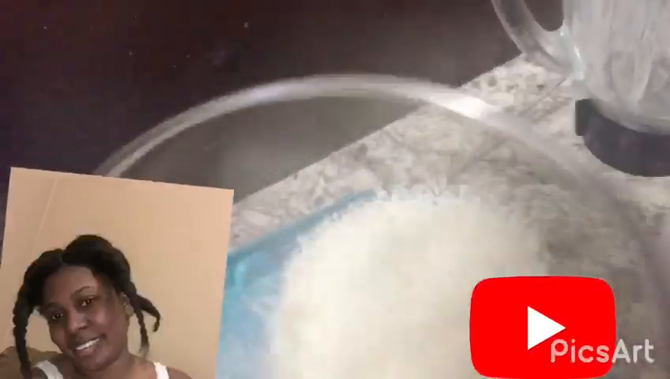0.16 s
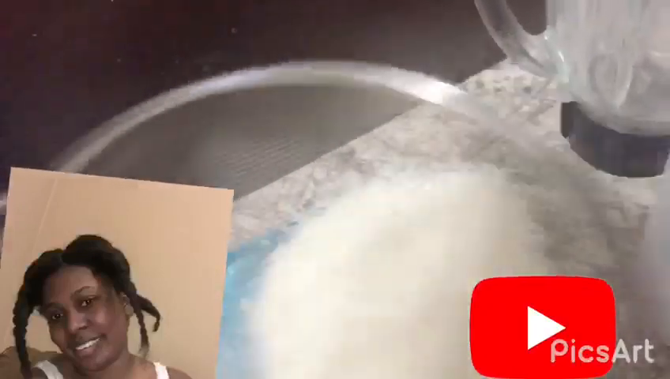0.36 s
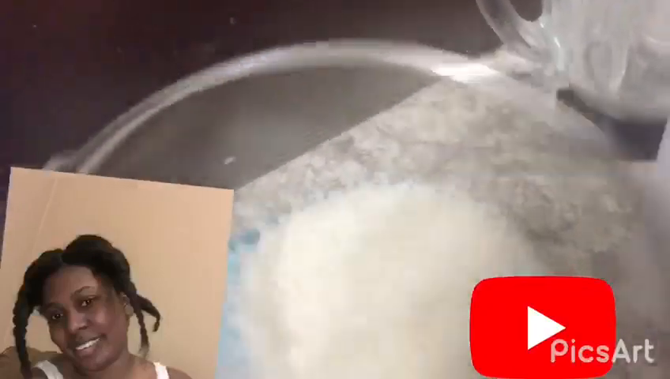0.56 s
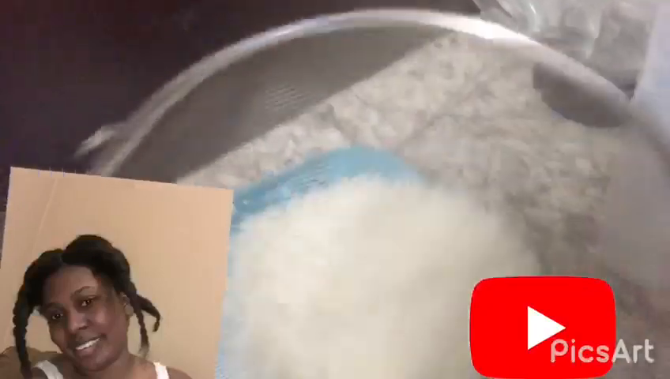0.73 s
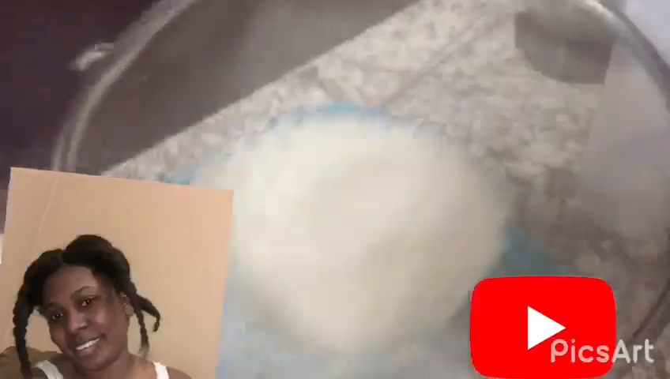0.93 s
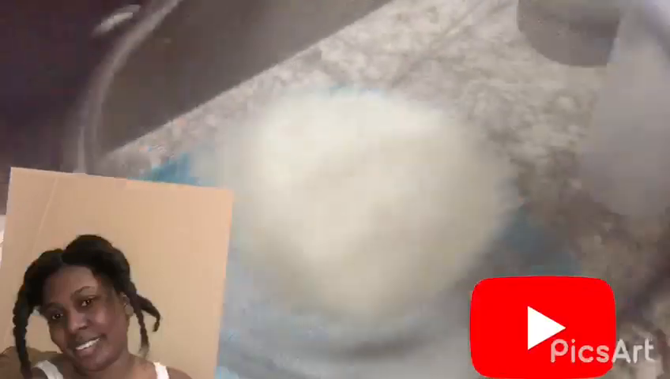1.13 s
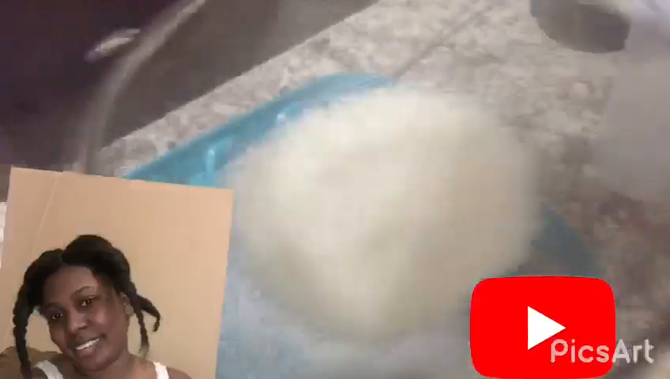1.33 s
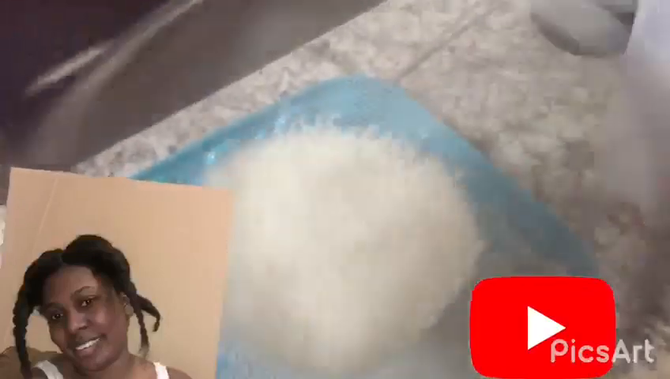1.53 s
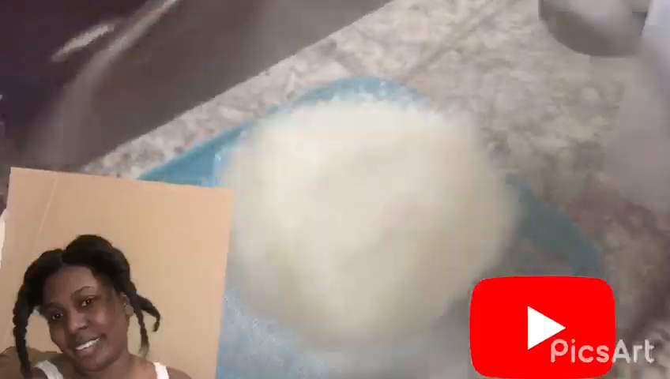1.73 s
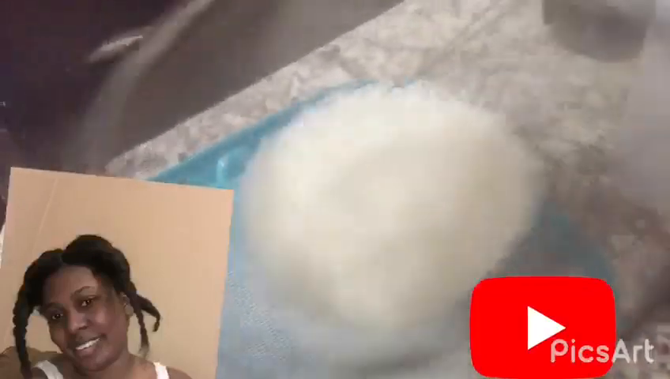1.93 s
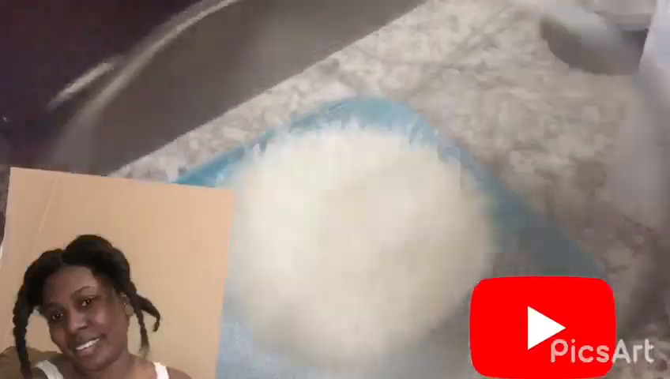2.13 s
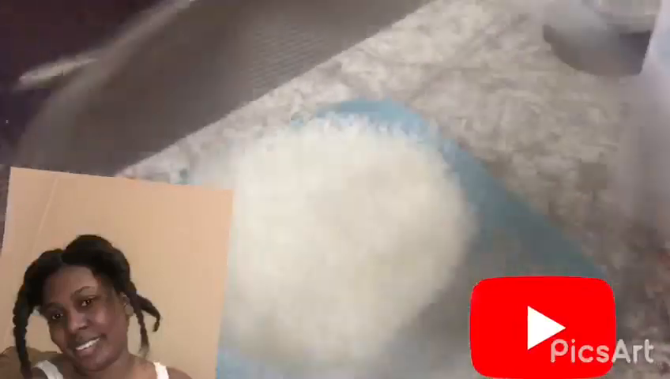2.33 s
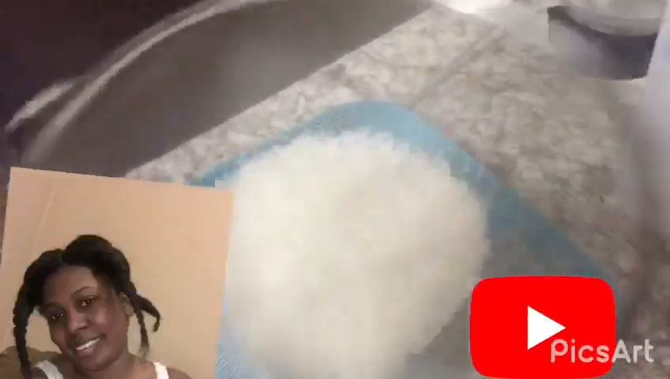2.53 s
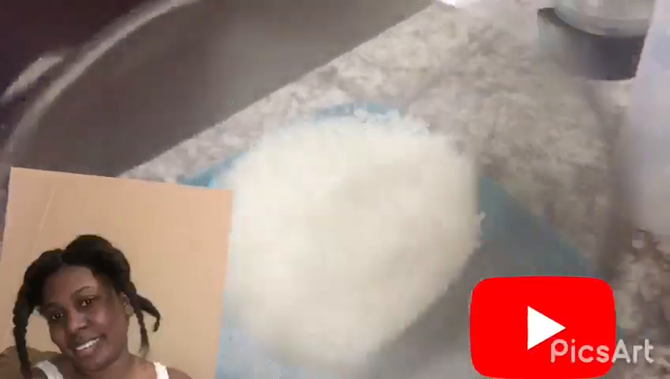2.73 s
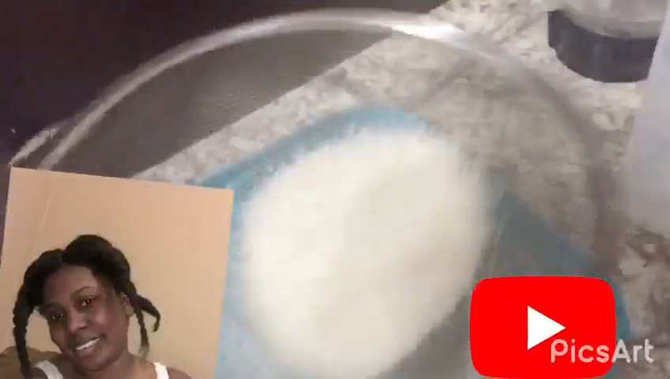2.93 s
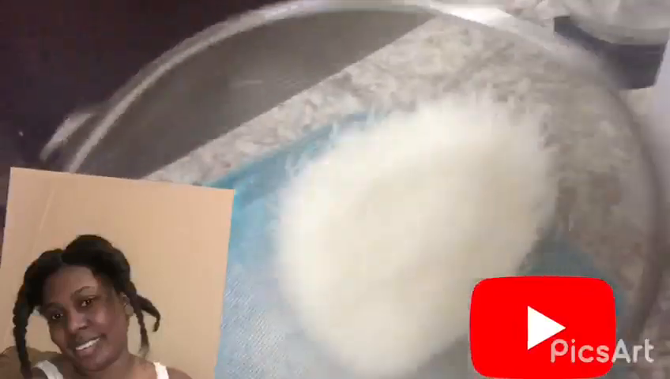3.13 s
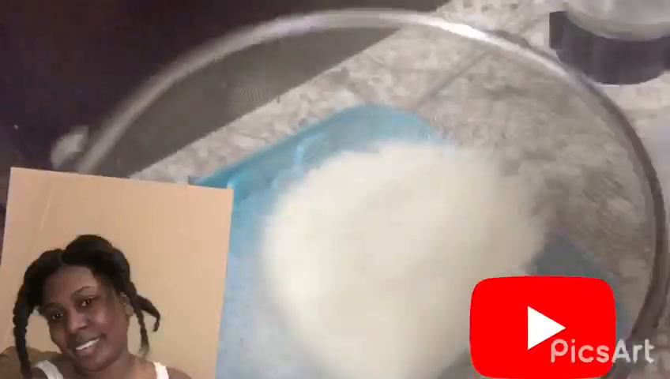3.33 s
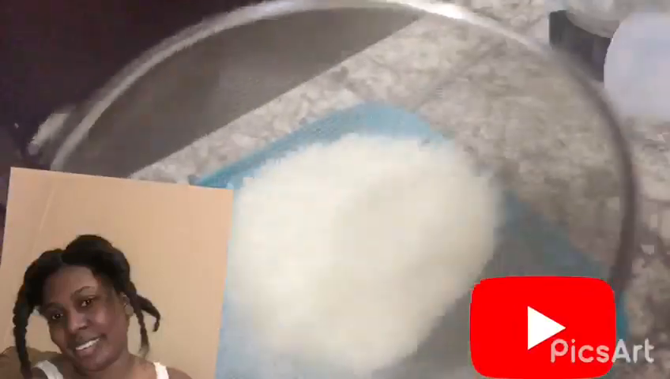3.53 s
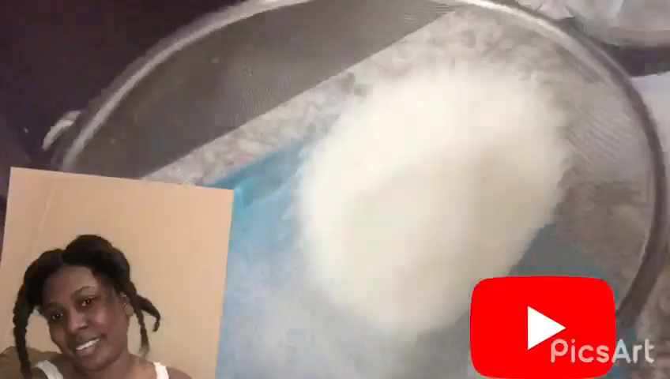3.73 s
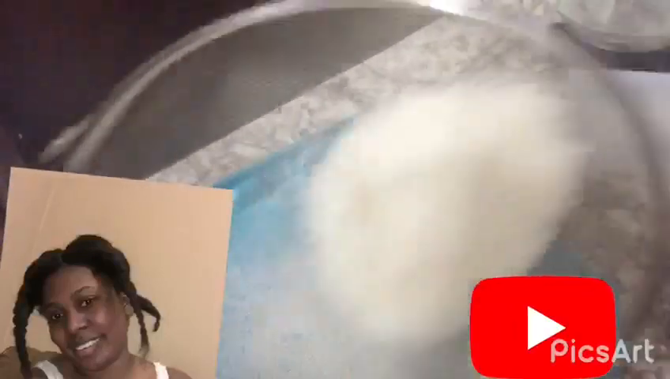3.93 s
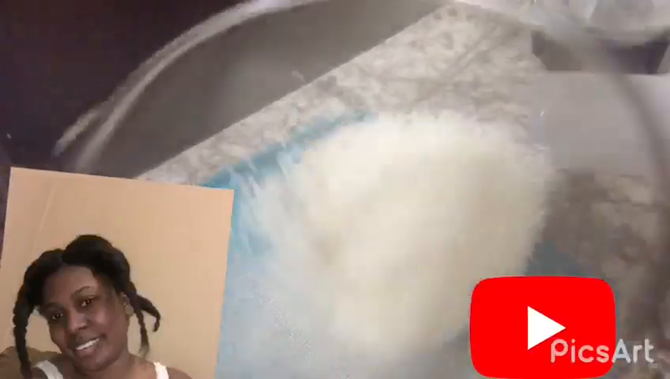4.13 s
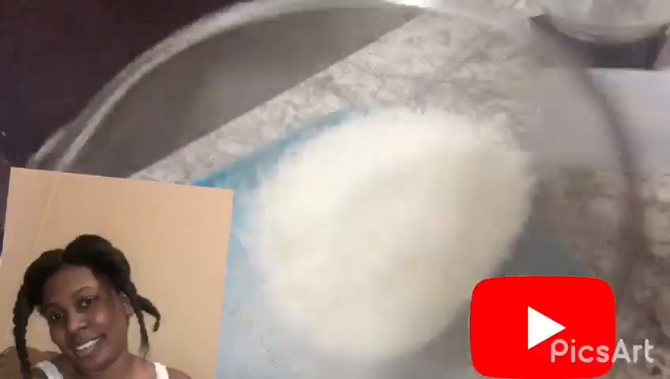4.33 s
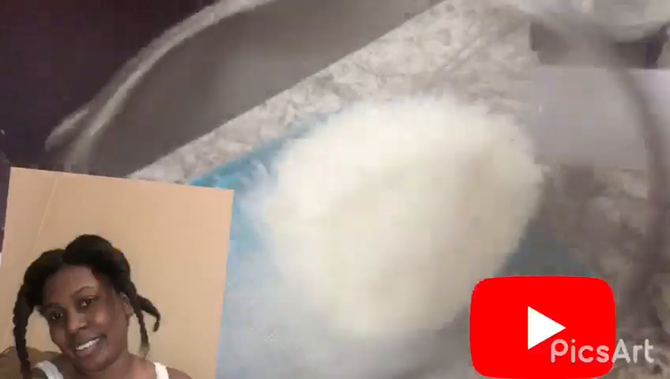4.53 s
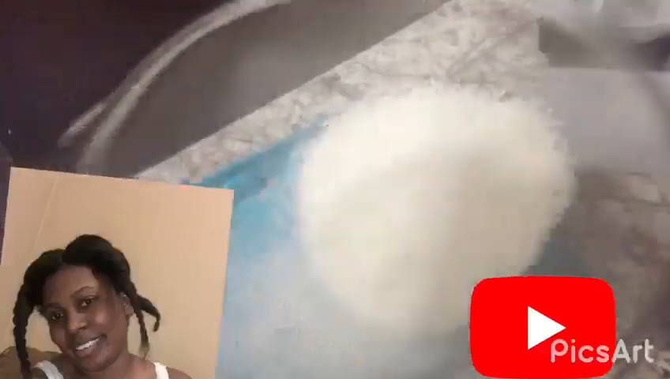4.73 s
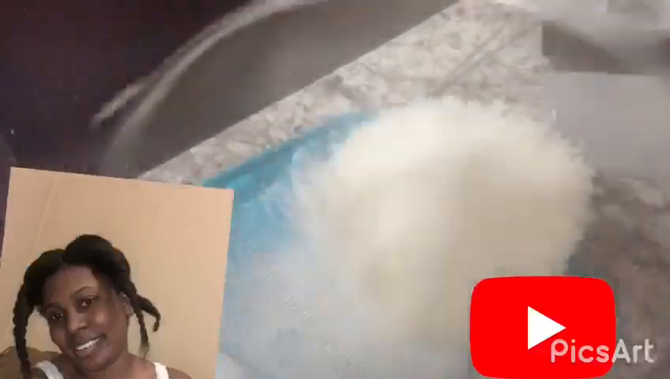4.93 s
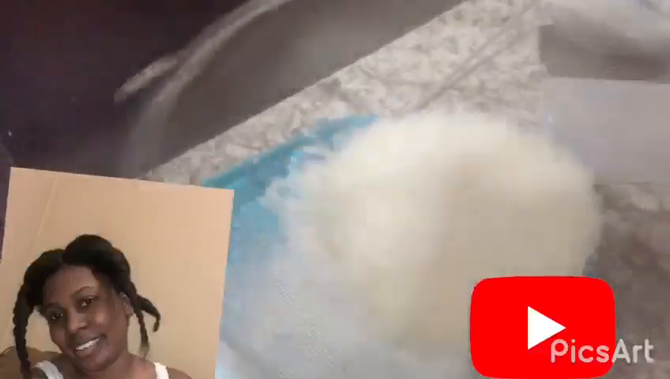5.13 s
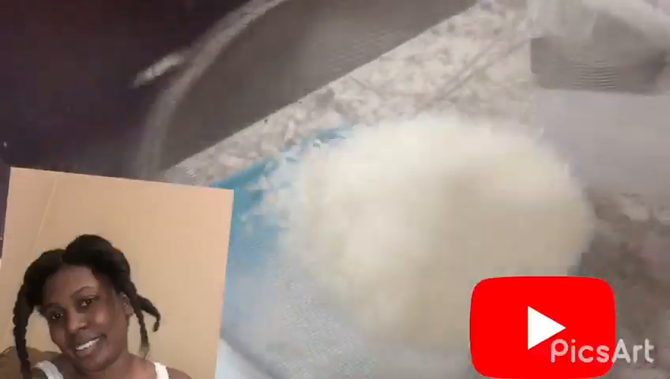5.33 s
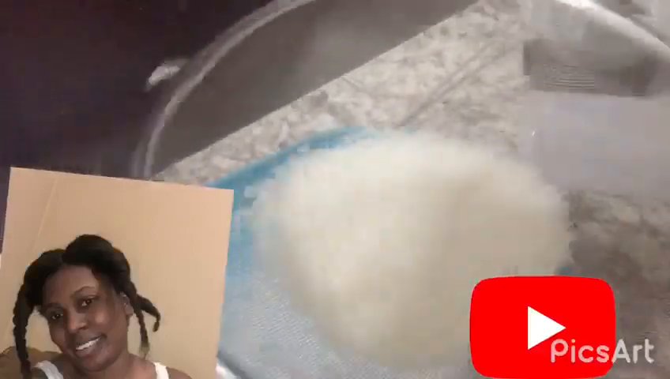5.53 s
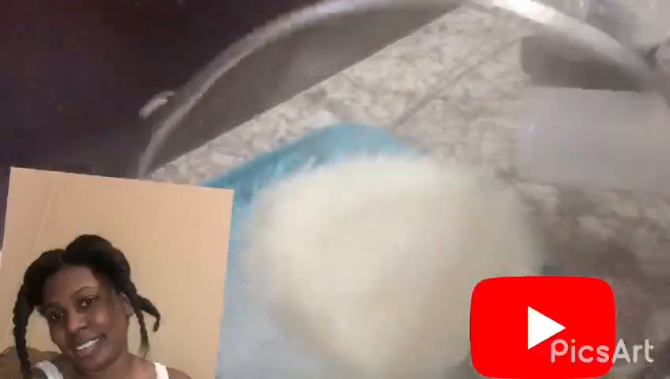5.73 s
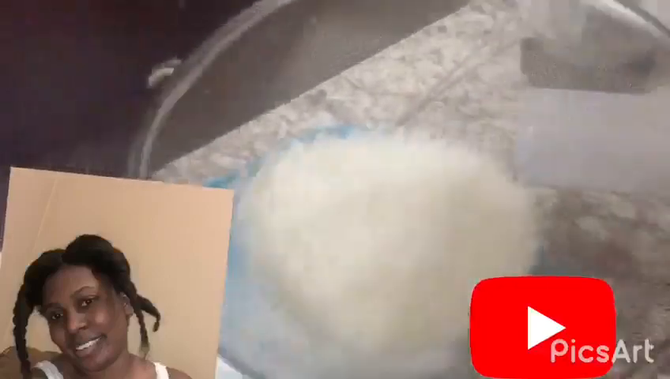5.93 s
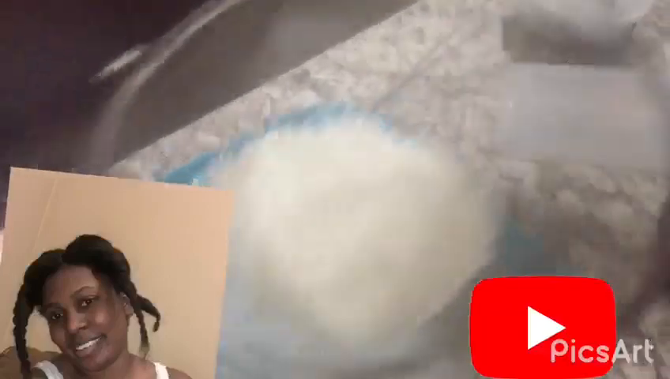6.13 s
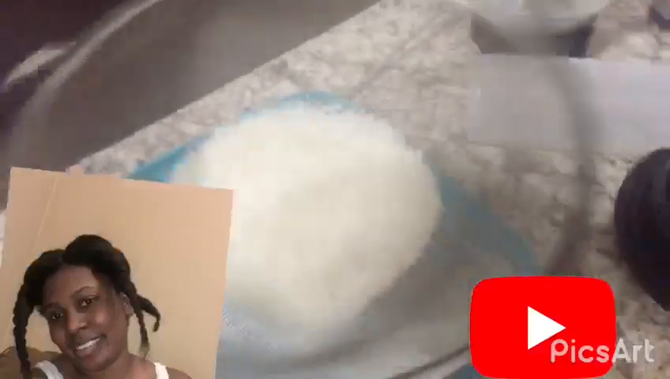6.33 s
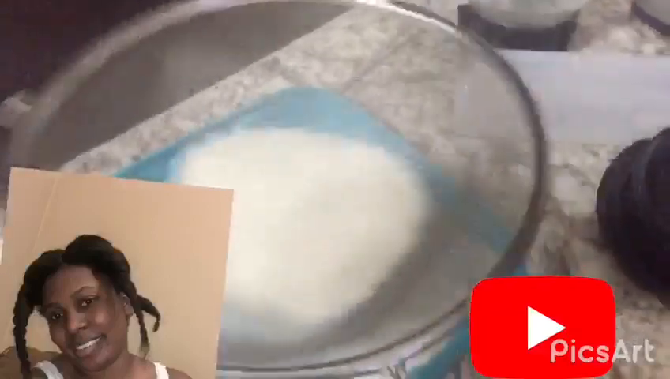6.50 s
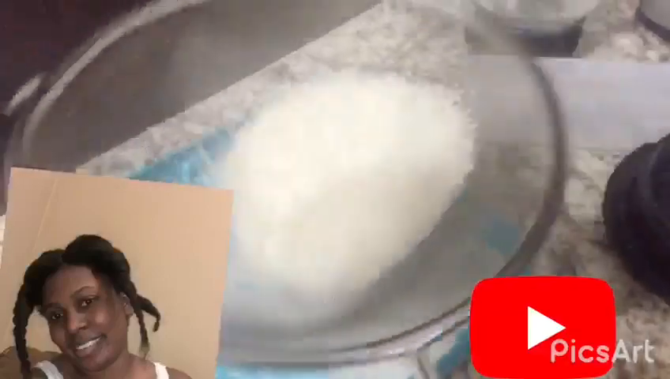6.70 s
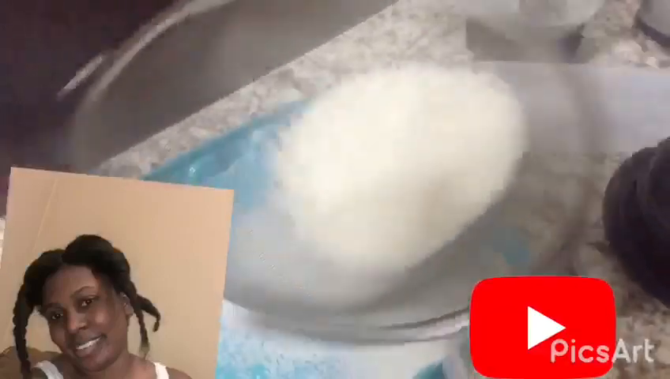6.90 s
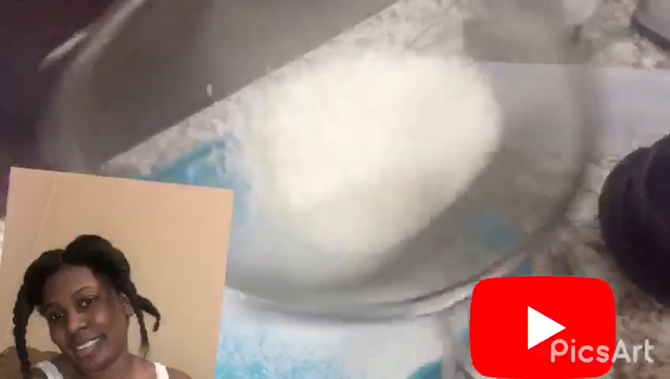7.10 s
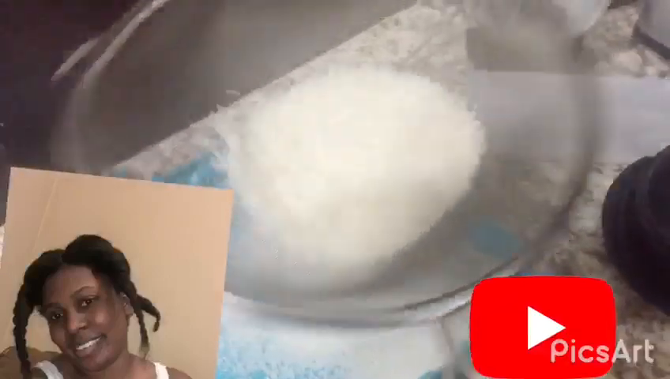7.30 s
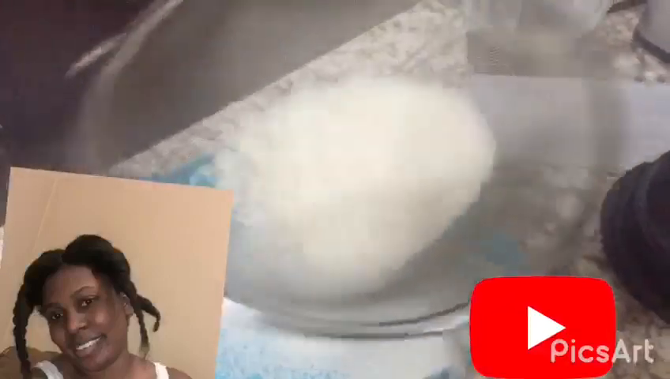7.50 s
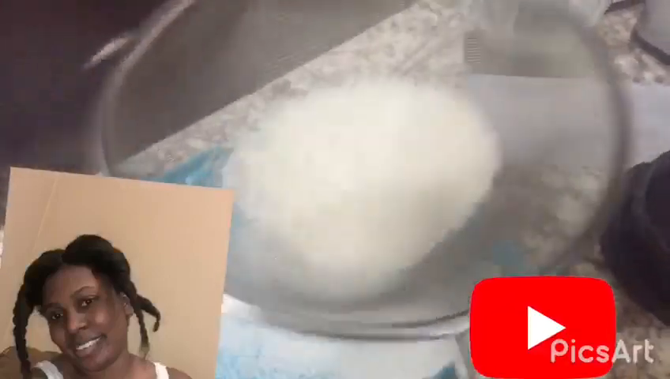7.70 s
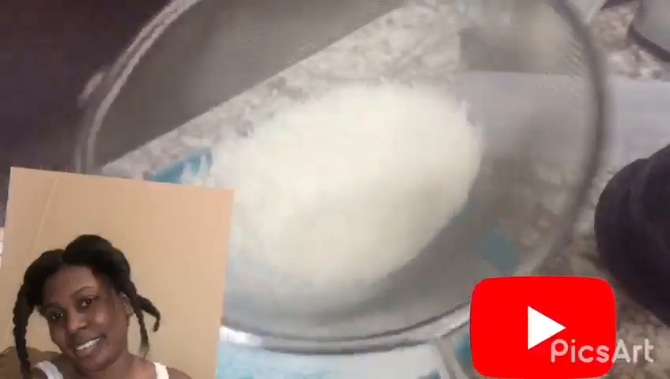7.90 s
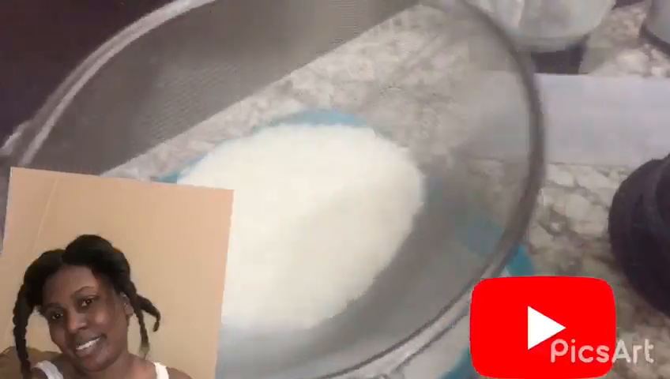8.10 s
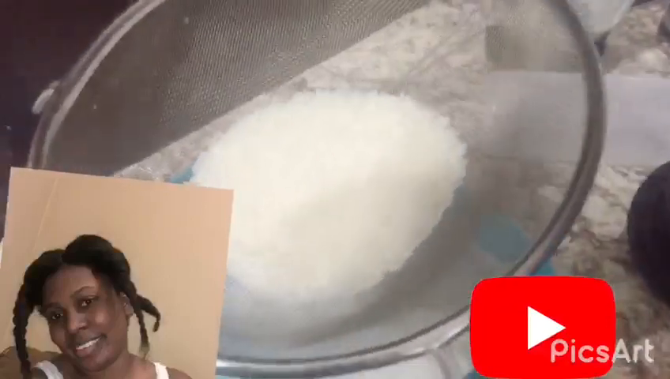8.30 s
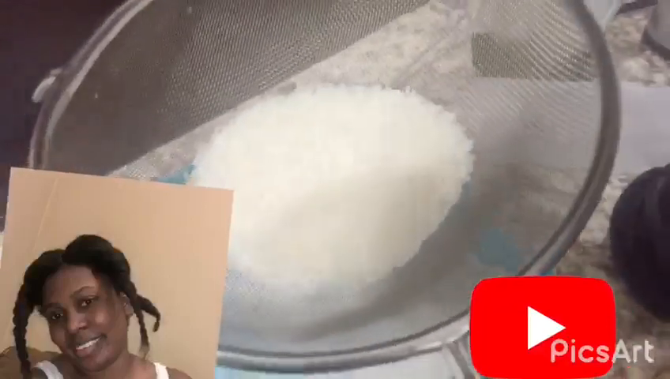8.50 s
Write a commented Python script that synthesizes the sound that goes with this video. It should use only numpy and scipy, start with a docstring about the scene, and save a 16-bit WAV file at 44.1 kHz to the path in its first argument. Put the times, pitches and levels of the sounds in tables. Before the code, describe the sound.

From the start, fine flour is shaken through a wire sieve, close up in a small kitchen. The heap slides back and forth at nearly ten strokes a second, each one a bright, dry, gritty hiss. Small ticks from the mesh and a few soft handling bumps dot the even rhythm. At about 3.3 seconds the rim taps a plastic tub, then rubs on it with a faint creak. From 3.6 to 4 seconds it clatters against the tub in a quick run of hollow knocks, the loudest moment. The sifting continues without a break at the same pace, easing slightly after 6 seconds and dying away at around 8.2 seconds. A faint fridge hum and a dull, low rumble lie underneath throughout and remain for the last half second.

```python
"""Sifting rice flour

A wire sieve is shaken over a plastic tub in a small kitchen, nearly ten strokes a second.
On each stroke the heap slides over the mesh with a gritty hiss. Midway the rim rubs on the tub and
clatters against it. The shaking dies away near the end, leaving the hum of a fridge."""
import sys
import numpy as np
from scipy import signal
from scipy.fft import rfft, irfft, next_fast_len
from scipy.io import wavfile

SR = 44100
rng = np.random.default_rng(int(sys.argv[2]) if len(sys.argv) > 2 else 0)


def int16_out(signal):
    """Quantize to a 16-bit WAV file."""
    q = np.round(np.clip(np.atleast_2d(signal).T, -1, 1) * 32767)
    wavfile.write(sys.argv[1], SR, q.astype(np.int16))


N = 377055
TIME_S = np.arange(N) / SR

# rasp of flour on wire: (frequency [Hz], relative density [dB])
MESH_SPECTRUM = [(3800, -23.5), (4500, -11.5), (4950, -13.5), (5550, -3), (5880, -3), (6250, 0),
                 (7050, -0.5), (7750, -4.5), (8750, -1.4), (10000, -5), (10400, -11), (11300, -10.5),
                 (11800, -16.5), (12300, -27)]
# whole wire bowl, driven by the heap's weight: (frequency [Hz], relative density [dB])
BOWL_SPECTRUM = [(600, -30), (1400, -25.5), (2100, -16.5), (2480, -16), (2850, -8.5), (3030, -5), (3300, 0),
                 (3700, 5), (4050, -2), (4500, -4), (5000, -16), (6200, -31.5)]


def from_db(db):
    """Decibels to gain."""
    return 10 ** (np.asarray(db) / 20)


def unit_rms(x):
    """Scale to rms 1."""
    return x / np.sqrt(np.mean(x ** 2) + 1e-20)


def drift(rate_hz):
    """Random wander, rms 1."""
    knots = rng.standard_normal(int(N / SR * rate_hz) + 2)
    return unit_rms(np.interp(TIME_S * rate_hz, np.arange(len(knots)), knots))


def colour(x, spectrum):
    """Filter by a spectrum that falls 48 dB/octave beyond its ends; rms 1."""
    hz, db = np.transpose(spectrum)
    size = next_fast_len(N)
    octave = np.log2(np.arange(size // 2 + 1) * SR / size + 1)
    beyond_oct = np.abs(octave - np.clip(octave, np.log2(hz[0]), np.log2(hz[-1])))
    gain = from_db(np.interp(octave, np.log2(hz), db) - 48 * beyond_oct)
    return unit_rms(irfft(rfft(x, size) * gain, size)[:N])


def noise(spectrum):
    """Coloured noise, rms 1."""
    return colour(rng.standard_normal(N), spectrum)


def bursts(times_s, levels_db, t60_s):
    """Envelope that jumps at each time and decays."""
    jumps = np.zeros(N)
    jumps[(times_s * SR).astype(int)] = from_db(levels_db)
    return signal.lfilter([1], [1, -from_db(-60 / (t60_s * SR))], jumps + 1e-18)


def ring(x, hz, t60_s):
    """One damped mode; a unit click rings at height 1."""
    radius, angle = from_db(-60 / (t60_s * SR)), 2 * np.pi * hz / SR
    return signal.lfilter([0, np.sin(angle)], [1, -2 * radius * np.cos(angle), radius ** 2], x + 1e-18)


def swing(at_s, hz, db, cycles, sag=0.66):
    """Struck plastic swells and is quickly damped; slow bending waves come last, so the pitch sags."""
    out, start = np.zeros(N), int(at_s * SR)
    age = TIME_S[:SR // 8] * hz / cycles  # 1 at the peak
    envelope = from_db(db) * age ** 2 * np.exp(2 - 2 * age)
    turns = cycles * (age + sag * (1 - np.exp(-age))) / (1 + sag / np.e)
    out[start:start + len(age)] = envelope * np.sin(2 * np.pi * turns)
    return out


def rumble():
    """Dull rumble of hands and room, with deep lumps in it."""
    # rumble contour: (time [s], level [dB])
    contour = [(0, -53), (.7, -55.5), (.9, -57.5), (2.1, -56), (3.35, -58), (3.5, -52.5), (4.1, -56.5),
               (4.499, -59.5), (5.4, -61.5), (5.75, -56), (6.6, -58), (7.95, -55.5), (8.1, -59.5),
               (8.55, -58)]
    # rumble colour: (frequency [Hz], relative density [dB])
    spectrum = [(25, -27.5), (50, -10.5), (80, -5), (130, -2.5), (190, 1.5), (240, -1.5), (330, 1),
                (440, -3), (600, -9), (800, -22), (1200, -32), (2500, -33)]
    lump_spectrum = [(28, -17), (50, -2.5), (85, 2.5), (130, 0.5), (200, -16)]
    level_db = np.interp(TIME_S, *np.transpose(contour))
    body = from_db(level_db + .5 + 2.8 * drift(22)) * noise(spectrum)
    lumps = from_db(level_db - 8 + 3.5 * drift(24)) * noise(lump_spectrum)
    return body + lumps


def fridge(shift_s):
    """Wavering hum whose tone shifts over the span shift_s."""
    # hum partials: (frequency [Hz], level [dB], change over the shift [dB])
    partials = [(59.2, -67.5, 1), (119.4, -71, 0), (195.2, -62.5, -2.5), (391.5, -61, -8), (475, -65, 0.5),
                (770, -79, -0.5)]
    shifted = np.interp(TIME_S, shift_s, [0, 1])
    hum = 0
    for hz, db, change_db in partials:
        rms = from_db(db + change_db * shifted + 1.55 * drift(4.8))
        turns = np.cumsum(hz * (1 + 0.0041 * drift(6))) / SR
        hum += rms * np.sqrt(2) * np.sin(2 * np.pi * turns)
    return hum


def air(level_db):
    """Faint steady hiss of still air."""
    # room air: (frequency [Hz], relative density [dB])
    spectrum = [(100, 0), (900, 2), (2000, -4.5), (3100, -10), (3500, -0.5), (4000, -6), (5600, -11.5),
                (6200, -3), (7000, -15), (10000, -16), (12000, -22.5)]
    return from_db(level_db) * noise(spectrum)


def kitchen(x, t60_s, wall_cut_hz):
    """Short diffuse tail, duller than the direct sound."""
    age_s = TIME_S[:SR // 2]
    tail = rng.standard_normal(len(age_s)) * from_db(-60 * age_s / t60_s) * (age_s > .005)
    walls = signal.butter(1, wall_cut_hz, fs=SR, output="sos")
    tail = signal.sosfilt(walls, tail / np.linalg.norm(tail))
    return signal.fftconvolve(x, tail)[:N]


def jolts():
    """Soft bumps of the handle in the hand."""
    # bumps: (time [s], pitch [Hz], level [dB])
    bumps = [(.112, 164, -35), (.537, 176, -40), (0.616, 190, -41), (4.38, 204, -47), (4.71, 680, -48),
             (6.027, 290, -46), (6.334, 183, -48), (7.144, 295, -45), (7.93, 585, -44), (8.085, 676, -44.5)]
    return sum(swing(*bump, cycles=1.6) for bump in bumps)


def rub(start_s, end_s, slips_per_s, pitch_hz, first_db, last_db):
    """The rim sticks and slips along the tub with a faint creak."""
    slips_s = np.arange(start_s, end_s, 1 / slips_per_s)
    slips_s += rng.normal(0, .0015, len(slips_s))
    creak = noise([(1100, -18), (1700, -22), (pitch_hz, 0), (2600, -18)])
    return bursts(slips_s, np.linspace(first_db, last_db, len(slips_s)), t60_s=.045) * creak


def clatter():
    """Each knock is a hard crack, a swing of the wall and a later thud of the base; the tub rings on."""
    # rim against tub: (time [s], local wall pitch [Hz], wall [dB], thud [dB], crack [dB])
    knocks = [(3.2706, 410, -29.5, -32, -27.5), (3.2917, 350, -37, -40.5, -52), (3.6, 668, -7, -23.5, -13),
              (3.6030, 1090, -15.5, -39, -35), (3.646, 1120, -14.5, -47, -25),
              (3.6694, 490, -15, -23.5, -27), (3.6729, 1060, -23, -42, -33),
              (3.731, 557, -18.5, -31.5, -21.5), (3.736, 1210, -19.5, -27.5, -24),
              (3.83, 453, -34, -30, -26), (3.8477, 1130, -11, -25, -12.5), (3.8520, 700, -34, -35, -29.5),
              (3.8554, 493, -16.5, -31.5, -32), (3.889, 880, -33, -35, -27.5),
              (3.9143, 438, -18.5, -30, -27.5), (3.9520, 466, -24.5, -34, -33.5),
              (3.9990, 410, -44, -42, -37.5), (4.1410, 710, -42, -48, -46.5)]
    # tub modes: (frequency [Hz], relative level [dB], t60 [s])
    modes = [(122, -20, 0.22), (180, -5, 0.43), (331.6, -7, 0.37), (429, 1, 0.12), (496, -3.5, 0.26),
             (743, -5.5, 0.089), (889, -14.5, 0.23), (1106, -5, 0.17), (1156, -7, 0.14),
             (1240, -10.5, 0.19), (1970, -16, .08), (2300, -14.5, .16), (2853, -13, .12), (3550, -16, .14)]
    # hard rim contact: (frequency [Hz], relative density [dB])
    crack_spectrum = [(300, -11), (800, 1.5), (1500, -3), (2000, 1.5), (2400, -3), (3200, 1), (3900, -0.5),
                      (4700, -14.5), (5600, -8), (7500, -19), (12000, -28)]
    times_s, wall_hz, wall_db, thud_db, crack_db = np.transpose(knocks)
    wall = sum(swing(*knock, cycles=1.75) for knock in zip(times_s, wall_hz, wall_db))
    crack = bursts(times_s, crack_db, t60_s=0.028) * noise(crack_spectrum)
    thud = sum(swing(at_s + .003, hz=155, db=db, cycles=0.89)
               + swing(at_s, hz=343, db=db + 0.5, cycles=2.5) for at_s, db in zip(times_s, thud_db))
    blows = np.zeros(N)
    blows[(times_s * SR).astype(int)] = np.sqrt(from_db(wall_db) * from_db(thud_db))
    ringing = sum(ring(blows * from_db(db + rng.standard_normal(N)), hz, t60_s)
                  for hz, db, t60_s in modes)
    bass_cut = signal.butter(2, 90, "high", fs=SR, output="sos")  # a small tub radiates no deep bass
    return signal.sosfilt(bass_cut, wall + crack + thud + from_db(-14) * ringing)


def hoop(rasp):
    """The rasp keeps the sieve's steel hoop ringing."""
    # hoop modes: (frequency [Hz], relative level [dB], t60 [s])
    modes = [(2920, -9, 0.022), (3210, -6.5, 0.021), (3405, -3.5, 0.031), (3603, -3.5, 0.025),
             (6400, -3.5, .03)]
    return sum(from_db(db) * unit_rms(ring(rasp, hz, t60_s)) for hz, db, t60_s in modes)


def ticks():
    """The mesh shifts in its rim with short bright ticks."""
    # mesh shifts: (time [s], level [dB])
    shifts = [(1.229, -33), (1.659, -36), (2.300, -31), (2.886, -32.5), (3.104, -35), (3.152, -36.5),
              (3.274, -22), (5.411, -34), (5.821, -34), (6.707, -37), (6.919, -30), (7.142, -35.5),
              (7.56, -38), (7.773, -36)]
    envelope = bursts(*np.transpose(shifts), t60_s=0.041)
    return envelope * (noise(MESH_SPECTRUM) + from_db(-6.5) * noise(BOWL_SPECTRUM))


def strokes(usual_shake_s=.21, draw_lead_s=0.092):
    """Each shake of the wrist slides the heap twice: a draw back, then a throw forward."""
    # shakes: (time of the throw's top speed [s], throw hiss [dB], draw hiss [dB])
    shakes = [(0.0, -28, -37), (.206, -30, -33), (.402, -30, -32), (.617, -32, -30.5),
              (0.818, -30.5, -33.5), (1.038, -28.5, -32), (1.251, -27.5, -31), (1.458, -29.5, -32.5),
              (1.672, -28.5, -28.5), (1.871, -32, -32), (2.070, -28.5, -33), (2.278, -29.5, -29),
              (2.488, -29, -29.5), (2.700, -28.5, -31.5), (2.909, -29, -31.5), (3.125, -27.5, -28.5),
              (3.328, -31, -27.5), (3.535, -32.5, -32.5), (3.737, -27.5, -33), (3.953, -29, -30.5),
              (4.171, -30, -28), (4.367, -30, -32), (4.575, -29.5, -31), (4.774, -28, -32),
              (4.984, -28, -29), (5.205, -28, -30.5), (5.423, -30, -29.5), (5.636, -32.5, -31.5),
              (5.845, -31, -32.5), (6.047, -30, -32), (6.267, -31.5, -32.5), (6.511, -35, -33),
              (6.729, -29, -37), (6.949, -29.5, -36), (7.165, -30.5, -32), (7.374, -33, -33.5),
              (7.582, -29.5, -33), (7.791, -30, -33.5), (7.999, -37.5, -32), (8.194, -73, -46.5)]
    throws_s = np.array(shakes)[:, 0]
    lengths_s = np.diff(throws_s, prepend=throws_s[0] - usual_shake_s)
    stretches = (lengths_s / usual_shake_s) ** 1.5
    # yields (time [s], hiss [dB], rise [s], fall [s], weight [dB], ring [dB], pitch scatter [octaves])
    for (at_s, throw_db, draw_db), stretch in zip(shakes, stretches):
        # draw: light, gathers slowly
        yield at_s - draw_lead_s, draw_db, 0.023 * stretch, 0.017, -13.5, 1.5, 0.046
        # throw: abrupt, presses and scatters the heap, damps the ring
        yield at_s, throw_db, .014, .018, -11, -1.5, .13


def grains(per_s, spread_db):
    """Grains of uneven size catch on the wires at random."""
    catches = rng.random(N) < per_s / SR
    return catches * rng.standard_normal(N) * from_db(spread_db * rng.standard_normal(N))


def shifting_wires(patchy_db, bands):
    """The moving heap damps and frees the mesh's many close resonances."""
    edges_hz = np.linspace(3600, 12600, bands + 1)
    scrapes = [grains(per_s=24000, spread_db=3.2), grains(per_s=24000, spread_db=1.9)]
    out = 0
    for k, band_hz in enumerate(zip(edges_hz, edges_hz[1:])):
        wires = signal.sosfilt(signal.butter(2, band_hz, "band", fs=SR, output="sos"), scrapes[k % 2])
        out += wires * from_db(patchy_db * drift(22))
    return out


def sifting(grit_db, mesh_t60_s):
    """The heap speeds up and stops on each stroke; the harder it presses, the more the bowl sounds."""
    # mesh left free to ring as the heap shifts and thins: (time [s], pitch [Hz], ring re hiss [dB])
    free_mesh = [(0, 7350, -8), (1.3, 6640, -9.5), (2.5, 6700, -17.5), (3.1, 6750, -8.5), (5.2, 6680, -14),
                 (5.8, 6800, -7), (6.7, 7100, -7.5), (7.3, 7200, -6), (8.2, 7120, -10)]
    free_s, free_hz, free_db = np.transpose(free_mesh)
    hiss_power, bowl_power, singing = np.zeros((3, N))
    for at_s, hiss_db, rise_s, fall_s, weight_db, ring_db, scatter_oct in strokes():
        near = slice(max(0, int((at_s - .15) * SR)), int((at_s + .15) * SR))
        lag_s = TIME_S[near] - at_s
        weight_jitter_db, ring_jitter_db, detune = rng.standard_normal(3)
        speed = from_db(hiss_db) * np.exp(-.25 * (lag_s / np.where(lag_s < 0, rise_s, fall_s)) ** 2)
        hiss_power[near] += speed ** 2
        bowl_power[near] += (speed * from_db(weight_db + weight_jitter_db)) ** 2
        mesh_hz = np.interp(at_s, free_s, free_hz) * 2 ** (scatter_oct * np.clip(detune, -2, 2))
        mesh_db = np.interp(at_s, free_s, free_db) + ring_db + ring_jitter_db
        friction = rng.standard_normal(SR // 2)[:len(lag_s)]
        ringing = ring(ring(friction, mesh_hz, mesh_t60_s), mesh_hz, mesh_t60_s)
        singing[near] += speed * from_db(mesh_db) * unit_rms(ringing)
    flutter = from_db(grit_db * drift(260))  # powder moves in small slips
    hiss = np.sqrt(hiss_power) * colour(shifting_wires(patchy_db=2.0, bands=28), MESH_SPECTRUM)
    bowl = np.sqrt(bowl_power) * colour(grains(per_s=26000, spread_db=1.6), BOWL_SPECTRUM)
    return flutter * (from_db(-0.26) * hiss + from_db(-0.12) * bowl + singing)


def scene():
    """Sieve and tub close by, the same in both channels."""
    sieve = sifting(grit_db=0.63, mesh_t60_s=0.0054) + ticks()
    sieve += from_db(-55) * hoop(sieve)
    tub = clatter()
    tub += rub(start_s=3.496, end_s=3.595, slips_per_s=72, pitch_hz=2080, first_db=-45, last_db=-40)
    room = kitchen(from_db(-12.5) * sieve + from_db(-11) * tub, t60_s=0.45, wall_cut_hz=7900)
    background = rumble() + from_db(-1) * fridge(shift_s=(5.7, 7.2)) + air(level_db=-65)
    return np.tile(sieve + tub + jolts() + room + background, (2, 1))


def record(dry):
    """Steep low-pass at 12.1 kHz."""
    return signal.sosfilt(signal.ellip(10, .3, 80, 12100, fs=SR, output="sos"), dry)


dry = scene()
out = record(dry)
int16_out(out)
```